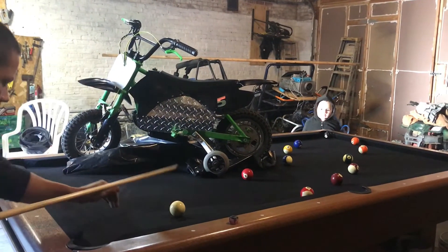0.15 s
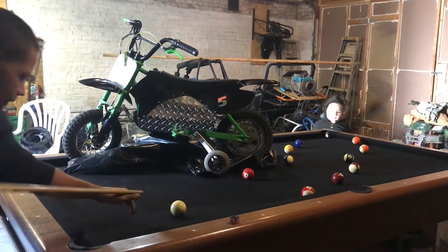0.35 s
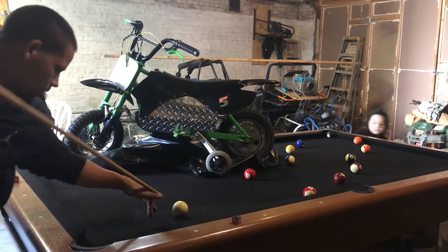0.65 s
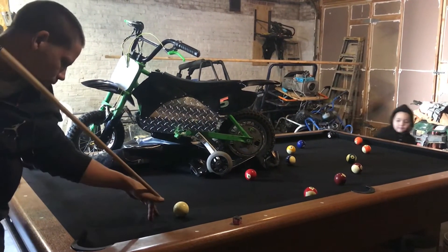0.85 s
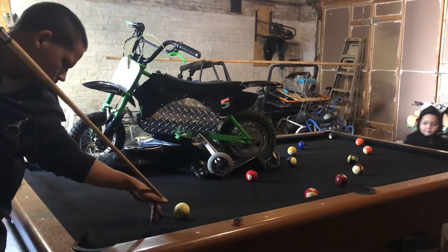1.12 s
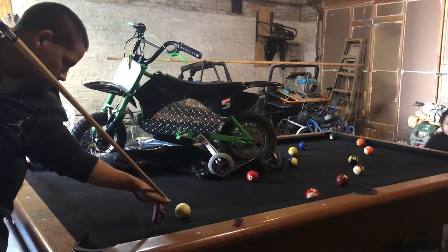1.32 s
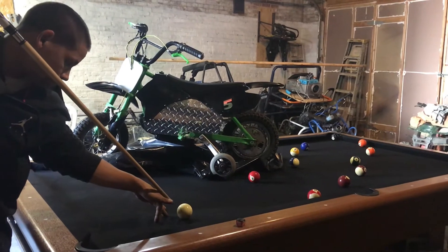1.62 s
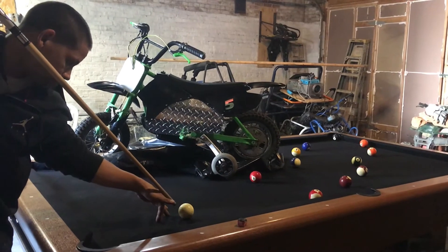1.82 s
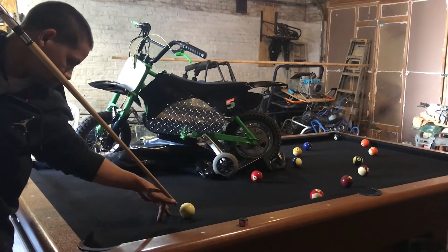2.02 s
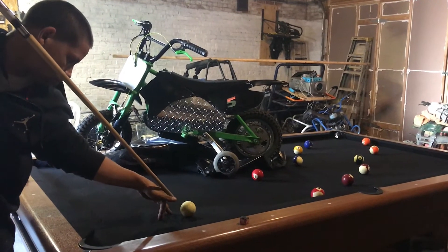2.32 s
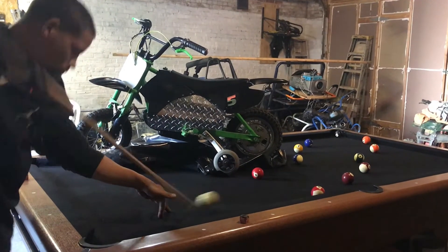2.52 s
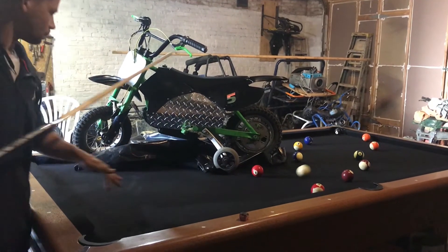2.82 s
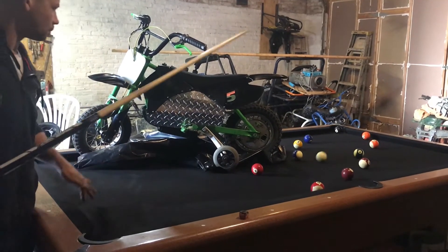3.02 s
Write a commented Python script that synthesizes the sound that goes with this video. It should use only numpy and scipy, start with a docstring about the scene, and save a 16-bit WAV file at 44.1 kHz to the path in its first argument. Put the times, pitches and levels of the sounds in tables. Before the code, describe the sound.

A pool cue strikes a ball with a loud hard knock in a reverberant garage, after faint taps and sleeve rustle; a low roll and tiny ticks follow, picked up close by a phone.

```python
"""A cue drives down on a pool ball with a hard knock that fills a garage: shaped reverberant noise, damped modes
of cue and slate, a push of air and bright clicks. Filtered noise makes the rustle of sleeve and cue before it
and the tip's scuff on the cloth, the rolling rumble and the room tone. Small taps are clicks heard mostly through
the room, a snap is a few decaying high modes, and tiny ticks of ringing noise follow the shot."""
import sys
import numpy as np
from scipy import signal
from scipy.fft import rfft, irfft
from scipy.io import wavfile
from scipy.ndimage import uniform_filter1d

SR = 44100
rng = np.random.default_rng(int(sys.argv[2]) if len(sys.argv) > 2 else 0)


def unload_audio(sound):
    """Save the sound as a 16-bit wav file, at the path given as the first command line argument."""
    columns = np.transpose(np.atleast_2d(sound))
    # keep every value between -1 and 1, then stretch to whole-number steps
    steps = np.round(np.clip(columns, -1, 1) * 32767)
    wavfile.write(sys.argv[1], SR, steps.astype(np.int16))


N = 138915  # samples

GRAIN_DB, GRAIN_HZ = 1.2, 500  # depth and rate of the level grain in rubbing sounds


def undb(db):
    """Decibels to amplitude ratio: 20 dB per factor of ten."""
    return 10 ** (np.asarray(db) / 20)


def level(x, db):
    """Scale by mean power, so that the RMS stands at db."""
    return x * undb(db) / np.sqrt(np.mean(x ** 2))


def colour(x, table):
    """Spectral shaping: gains in dB interpolated over log frequency between (Hz, dB) points."""
    hz, db = np.array(table, float).T
    f = np.maximum(np.fft.rfftfreq(len(x), 1 / SR), 1)
    gain = undb(np.interp(np.log(f), np.log(hz), db))
    return irfft(rfft(x) * gain, len(x))


def band(x, hz, width_hz):
    """Two-pole resonance with gain 1 at its centre."""
    q = max(hz / width_hz, .35)
    return signal.lfilter(*signal.iirpeak(hz, q, fs=SR), x)


def fade(t, t60):
    """Exponential decay from t = 0, falling 60 dB in t60 seconds; silent before."""
    return np.exp(-np.log(1000) * np.maximum(t, 0) / t60) * (t >= 0)


def walk(rate):
    """Slow random modulation: Gaussian levels held 1 / rate s, smoothed twice, spread near 1."""
    k = int(SR / rate)
    steps = np.repeat(rng.standard_normal(N // k + 1), k)
    return 1.4 * uniform_filter1d(uniform_filter1d(steps, k), k)[:N]


def add(out, x, s):
    """Superpose x on out from s seconds, cut at the end."""
    i = int(round(s * SR))
    out[i:i + len(x)] += x[:len(out) - i]


def garage(early_db):
    """Diffuse reverberation: dense echoes in third-octave bands, each with its own build-up and decay."""
    # Reverberation of the garage. Each row: frequency in Hz, T60 in s, build-up time constant in s.
    reverberation = [(60.2, 0.84, 0.008), (150, 1, 0.0045), (300, 0.76, .003), (700, 0.72, 0.0023),
                     (1517, 0.69, 0.0015), (2960, 0.59, .001), (6000, 0.51, .001), (12000, 0.55, 0.00079)]
    early_t60_s = 0.13  # near surfaces: a shorter decay
    t = np.arange(SR) / SR
    hz, t60, rise = np.array(reverberation).T
    f = np.maximum(np.fft.rfftfreq(SR, 1 / SR), 1)
    spectrum = rfft(rng.standard_normal(SR))
    out = np.zeros(SR)
    for centre in np.arange(np.log2(40), np.log2(20000), 1 / 3):  # octaves
        share = np.clip(1 - 3 * np.abs(np.log2(f) - centre), 0, 1)  # overlapping triangles
        band_t60 = np.interp(centre, np.log2(hz), t60)
        band_rise = np.interp(centre, np.log2(hz), rise)
        decay = fade(t, band_t60) + undb(early_db) * fade(t, early_t60_s)
        build_up = (1 - np.exp(-t / band_rise)) ** 2
        out += irfft(spectrum * share, SR) * decay * build_up
    return out / np.sqrt(np.mean(out[:SR // 20] ** 2))  # first 50 ms at RMS 1


def room_tone():
    """Stationary broadband noise over narrow bands of low noise whose levels waver at random."""
    # Spectrum of the steady noise. Each row: frequency in Hz, relative density in dB per Hz.
    spectrum = [(15, -38), (33, -13.5), (97, -5.5), (256, -8.5), (309, -7), (384, -40.5), (427, -9.5),
                (476, -16.5), (1070, -21), (2350, -32), (16000, -40.5)]
    # Booming bands. Each row: centre in Hz, width in Hz, level in dB before wavering and swell.
    booms = [(58, 7.8, -67), (92.6, 12, -60), (123.5, 5.8, -70.5), (203.4, 30, -65), (294.6, 18, -64.5)]
    # Swell of the upper booming bands. Each row: time in seconds, gain in dB.
    swell_points = [(0, -3), (.4, 2.5), (.9, 6), (1.3, -1.5), (2, 0), (2.399, -0.5), (3.15, -6)]
    low = level(colour(rng.standard_normal(N), [(300, -2.5), (1500, -19.0)]), 0)
    swell = undb(np.interp(np.arange(N) / SR, *np.array(swell_points).T))
    out = level(colour(rng.standard_normal(N), spectrum), -61.5)
    for hz, width, db in booms:
        boom = level(band(low, hz, width), db) * undb(1.5 * walk(6))
        out += boom * (swell if hz > 150 else 1)
    return out


def drone():
    """Narrow-band noise, heard as a wavering low pitch, that fades out early on."""
    hz, width_hz, end_s, fade_s = 183.4, 13.7, 0.6, 0.071
    x = band(band(rng.standard_normal(N), hz, width_hz), hz, 2 * width_hz)
    return level(x, -58.5) * np.clip((end_s - np.arange(N) / SR) / fade_s, 0, 1)


def rustle():
    """Friction of sleeve and shaft: grainy noise in three bands with moving levels."""
    # Course of the friction. Each row: time in seconds, level of the middle band in dB,
    # treble above about 7 kHz and body under about 1.5 kHz, both in dB against the middle.
    course = [(0, -73, 0, -3), (.03, -66, 4, -19), (.066, -73, 1, 6), (.11, -65.5, 0, 0), (.27, -69, 0, -6),
              (.37, -72, -7, 2), (.45, -75.5, 1, -3), (.525, -64, -14, -4), (.55, -60.5, -5, -0.5),
              (.57, -53, -7, -7), (.67, -55, -4, -4), (.70, -45, -4.5, -12), (.742, -42.5, -8.5, -9.5),
              (.77, -48, -7.5, -6), (.795, -54.5, -12, -2), (.836, -57, -14, -0.5), (.888, -59, 2.5, 0.5),
              (1.026, -72.5, -9, -0.5), (1.37, -69.5, -11, -4), (1.41, -63.5, -12, -10.5),
              (1.62, -79, -10, 1), (1.73, -70, -9, -6), (1.9, -80, -13, 2), (2.4, -76, 3, -5),
              (2.459, -59.5, -6.5, 2.5), (2.6, -67, -10, 2), (2.85, -70, -1.5, -8.5),
              (3.15, -69.5, -4.5, -4)]
    # Spectrum of the rubbing cloth. Each row: frequency in Hz, relative density in dB per Hz.
    cloth = [(400, -12.5), (850, -8), (1300, -8), (1900, -6), (2800, 1), (4200, -0.5), (5200, -4.5),
             (7500, -7.5), (16000, -12)]
    t = np.arange(N) / SR
    grains = rng.standard_normal(N) * undb(GRAIN_DB * walk(GRAIN_HZ))
    x = colour(grains, [(100, -73), *cloth])
    middle = colour(x, [(1000, -40), (1500, -4), (1900, 0), (6000, 0), (7300, -4), (10000, -40)])
    treble = colour(x, [(5300, -40), (7300, -4), (8800, 0)])
    body = colour(x, [(1200, 0), (1500, -4), (2200, -40)])
    s, db, treble_db, body_db = np.array(course).T
    mix = level(middle, 0)
    mix += level(treble, 0) * undb(np.interp(t, s, treble_db))
    mix += level(body, 0) * undb(np.interp(t, s, body_db))
    return undb(np.interp(t, s, db)) * mix


def snap():
    """Modal ringing: a few high modes struck once, decaying together."""
    # Modes of the small hard snap. Each row: frequency in Hz, relative level in dB.
    modes = [(2370, -4.5), (2960, -3), (4030, 0), (4470, 3), (4780, -3), (5560, -1), (6230, -3), (7100, -2)]
    start_s, rise_s, t60_s = .4594, 0.00088, 0.056
    t = np.arange(N) / SR - start_s
    ring = sum(undb(db) * np.sin(2 * np.pi * (hz * t + rng.random())) for hz, db in modes)
    return undb(-52.5) * fade(t, t60_s) * np.clip(t / rise_s, 0, 1) * ring


def taps(room):
    """Room response to an impulse: a direct click and its echoes, band-passed to each tap's colour."""
    # Small taps. Each row: start in seconds, RMS level over the first 50 ms in dB,
    # centre in Hz, width in Hz, direct click over the echoes in dB before filtering.
    tap_rows = [(.0867, -61.5, 1490, 2480, 25), (.163, -64, 2460, 2600, 27),
                (0.2836, -69.5, 5330, 3960, 30), (.345, -58.5, 247, 300, 30), (.4594, -59, 5700, 6900, 25),
                (0.5389, -60.5, 2760, 420, 27), (.9991, -70, 1070, 2000, 30), (1.6836, -53, 980, 864, 29),
                (1.6837, -73.5, 2520, 2200, 30), (1.0, -72, 3400, 600, 31), (1.043, -73, 3400, 297, 27),
                (1.266, -75, 3200, 149, 27)]
    out = np.zeros(N)
    for s, db, hz, width, direct_db in tap_rows:
        echo = room.copy()
        echo[2] += undb(direct_db)
        x = band(band(band(echo, hz, width), hz, 2 * width), hz, 2 * width)
        add(out, x * undb(db) / np.std(x[:SR // 20]), s)
    return out


def roll(strike_s):
    """Rolling noise: low band-passed noise of uneven level, dying away as the ball runs off on the slate."""
    hz, rise_s, t60_s = 90, 0.045, 2.3
    t = np.arange(N) / SR - strike_s
    x = band(band(rng.standard_normal(N), hz, 90), hz, 180) * undb(2.3 * walk(9.6))
    return level(x, -40.5) * fade(t, t60_s) * np.clip(t / rise_s, 0, 1)


def ticks():
    """Resonant noise bursts: a short high ring with some hiss, decaying exponentially."""
    # Bright ticks after the shot. Each row: start in seconds, relative level in dB,
    # ring frequency in Hz, hiss against the ring in dB.
    tick_rows = [(2.7747, -54, 6580, -0.5), (2.8505, -62, 6900, 5.5), (2.9104, -51, 14300, -6),
                 (2.921, -58, 11300, -10), (2.935, -56, 11360, 3), (2.9627, -61, 7160, 3)]
    t60_s = 0.056
    out, t = np.zeros(N), np.arange(SR // 10) / SR
    for s, db, hz, hiss_db in tick_rows:
        noise = rng.standard_normal(len(t))
        ring = level(band(band(noise, hz, 250), hz, 600), 0)
        hiss = level(band(band(noise, 12000, 6000), 12600, 8000), hiss_db)
        add(out, (ring + hiss) * fade(t, t60_s) * undb(db) / 2, s)
    return out


def scuff():
    """Sliding friction of the tip on the cloth: grainy high noise with a rise, a hold and a decay."""
    # Spectrum of the scuff. Each row: frequency in Hz, relative density in dB per Hz.
    spectrum = [(3000, -6), (6000, -3), (9000, -3.5), (10500, -7.5), (12500, -9.5), (16000, -15.5)]
    start_s, rise_s, hold_s, t60_s = 2.478, 0.011, 0.062, 0.25  # hold counts from the start
    t = np.arange(N) / SR - start_s
    envelope = np.clip(t / rise_s, 0, 1) * fade(np.maximum(t - hold_s, 0), t60_s)
    hiss = level(colour(rng.standard_normal(N), [(1000, -49), *spectrum]), -44)
    return envelope * undb(GRAIN_DB * walk(GRAIN_HZ)) * hiss


def tip_clicks():
    """Resonance of the hard tip: high band-passed noise under a very short decay."""
    # Clicks of the tip. Each row: start in seconds, peak level in dB, ring frequency in Hz.
    click_rows = [(2.4508, -18, 8800), (2.4775, -29, 8600), (2.4773, -39, 13000)]
    t60_s = 0.011
    out, t = np.zeros(N), np.arange(SR // 20) / SR
    for s, db, hz in click_rows:
        click = band(band(rng.standard_normal(len(t)), hz, 2600), hz, 6300) * fade(t, t60_s)
        add(out, click * undb(db) / np.abs(click).max(), s)
    return out


def air_push(t):
    """Pressure pulse from the contact: one and a half inverted sine cycles under a half-sine window."""
    hz = 966
    window = np.sin(np.pi * np.minimum(hz * t / 1.5, 1))
    return -undb(-3) * np.sin(2 * np.pi * hz * t) * window


def cue_and_slate(t):
    """Modal superposition: damped sines, each swelling over a few of its own cycles."""
    # Modes of cue and slate bed. Each row: frequency in Hz, relative level in dB, T60 in s.
    modes = [(118.1, -7, .3), (277.5, -6.5, 0.64), (337, -7, 0.49), (444, -12.5, 0.3), (530.6, -11, 0.7),
             (578, -7.5, 0.23), (676.6, -5, 0.18), (825.6, -1, 0.28), (879, -6.5, 0.38), (1030, -6, 0.15),
             (1215, -7, 0.44), (1823, -2.5, .15), (2763, -12, .2), (3166, -8.5, .11), (3730, -12.5, 0.19)]
    rise_cycles = 3.8  # time constant
    ring = np.zeros(len(t))
    for hz, db, t60 in modes:
        swell = 1 - np.exp(-t * hz / rise_cycles)
        ring += undb(db) * fade(t, t60) * swell * np.sin(2 * np.pi * (hz * t + rng.random()))
    return ring * undb(-13.5)


def knock(room, strike_s):
    """Impact excitation: a brief contact sets off the room and the modes of cue and table."""
    # Spectrum of the knock in the room. Each row: frequency in Hz, relative density in dB per Hz.
    spectrum = [(35, -55), (68, -17.5), (85, -9.5), (120, -10), (175, -10), (280, 0), (514, -2),
                (800, -1.5), (1000, -1.5), (1250, -2), (2000, -6.5), (2800, -8.5), (4000, -12.5),
                (5000, -26), (15000, -57.5)]
    contact_s = 0.00062  # onset time constant
    t = np.arange(SR) / SR
    onset = 1 - np.exp(-t / contact_s)
    boom = colour(room, spectrum)
    boom *= undb(-11.5) / np.std(boom[:SR // 20])
    out = tip_clicks()
    add(out, onset * (boom + cue_and_slate(t)), strike_s)
    add(out, air_push(t), strike_s + 0.0012)
    return out


def scene():
    """Linear superposition of the background, the handling sounds and the shot."""
    strike_s = 2.4512
    background = room_tone() + drone()
    handling = rustle() + snap() + taps(garage(-2))  # taps are far from near surfaces
    shot = knock(garage(5), strike_s) + scuff() + roll(strike_s) + ticks()  # stronger early decay, dB
    return (background + handling + shot)[None]


def record(dry):
    """Phone response, soft saturation of the loudest peaks and a steep low-pass."""
    # Response of the phone. Each row: frequency in Hz, gain in dB.
    response = [(20, -8.5), (45, 0.5), (9000, 0), (10500, -3.5), (12000, 0)]
    ceiling, top_hz = 1.3, 15850
    x = ceiling * np.tanh(colour(dry[0], response)[None] / ceiling)
    low_pass = signal.ellip(10, .2, 80, top_hz, fs=SR, output="sos")
    return signal.sosfilt(low_pass, x)


dry = scene()
out = record(dry)
unload_audio(out)
```